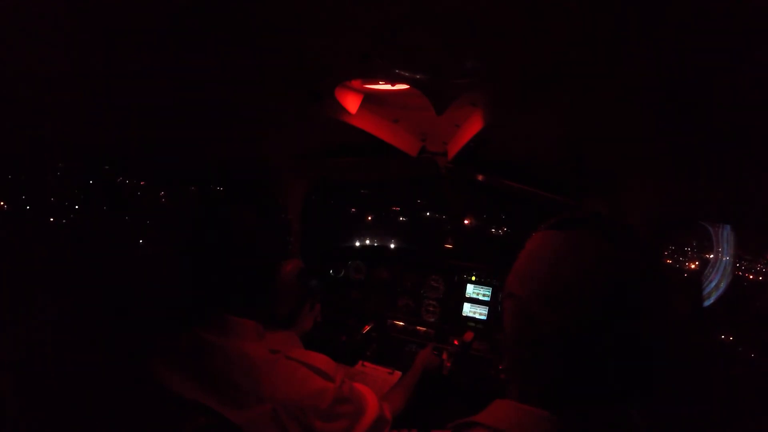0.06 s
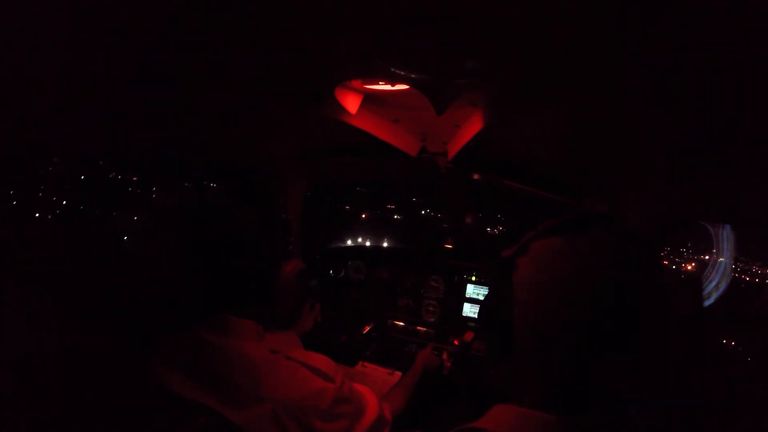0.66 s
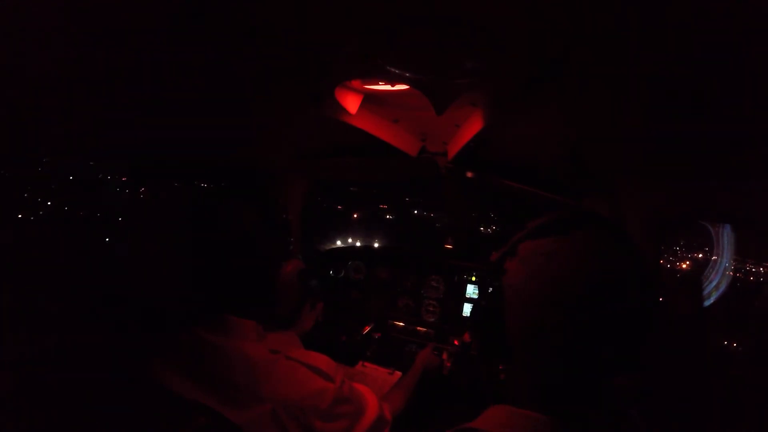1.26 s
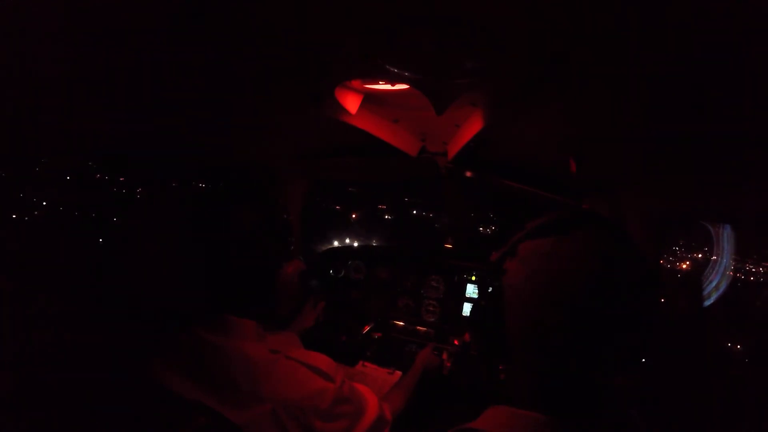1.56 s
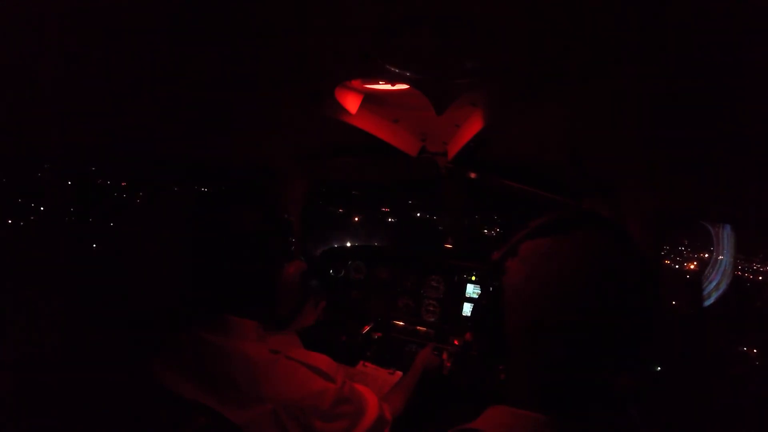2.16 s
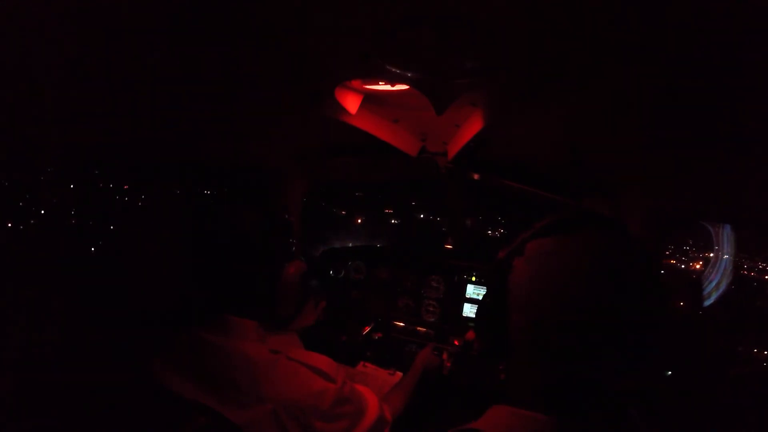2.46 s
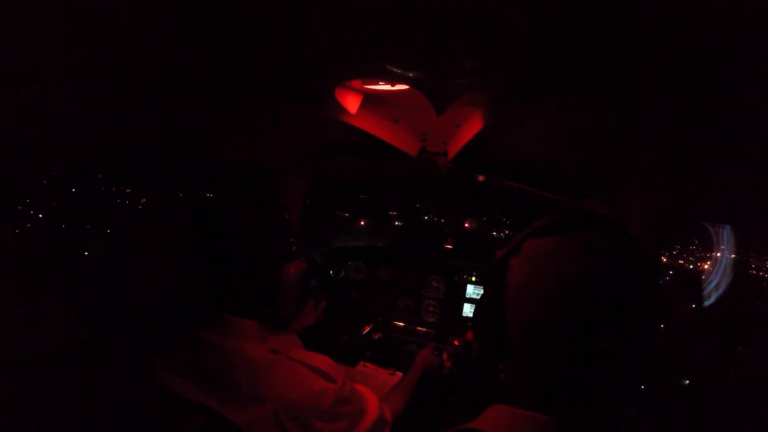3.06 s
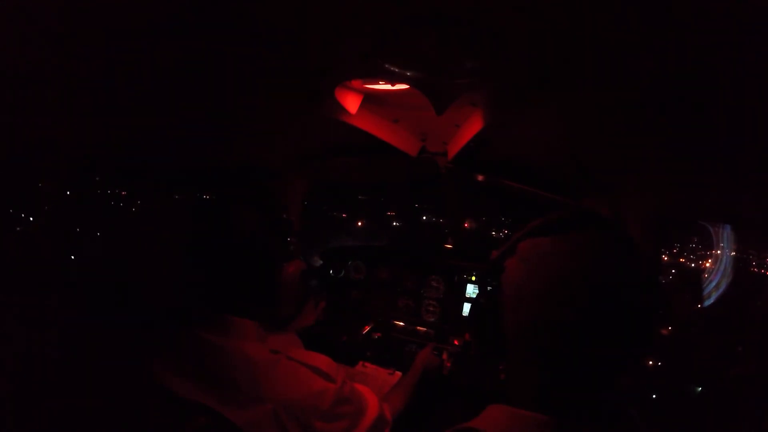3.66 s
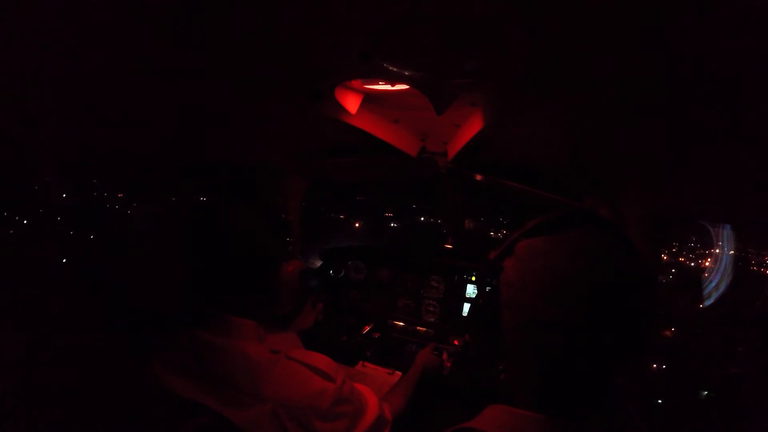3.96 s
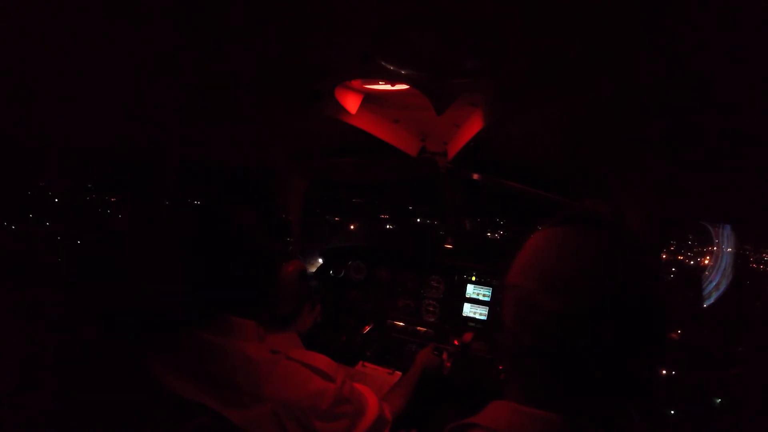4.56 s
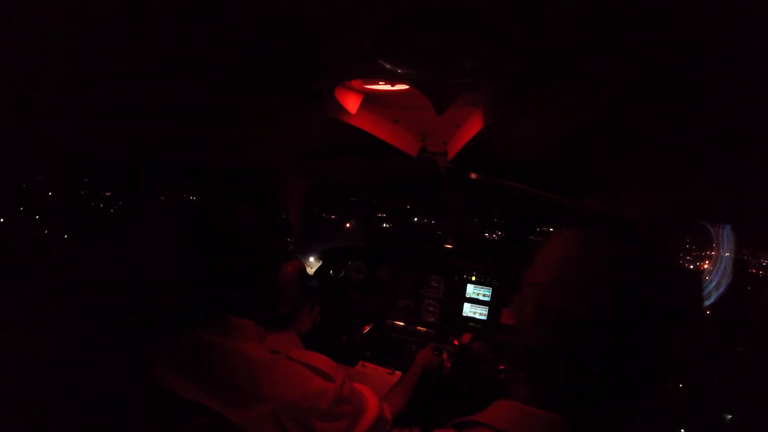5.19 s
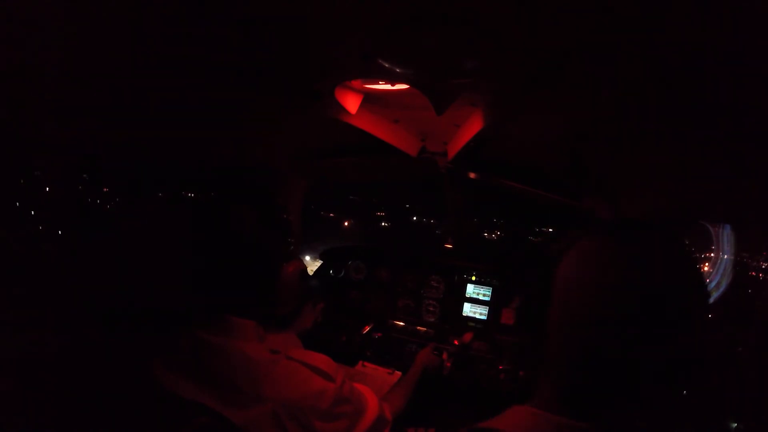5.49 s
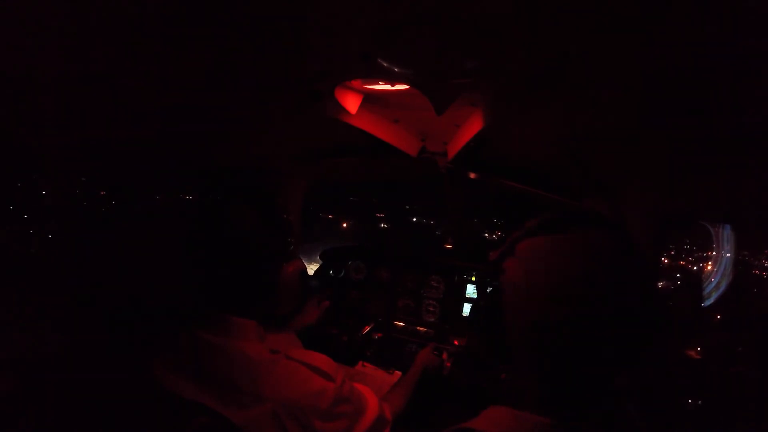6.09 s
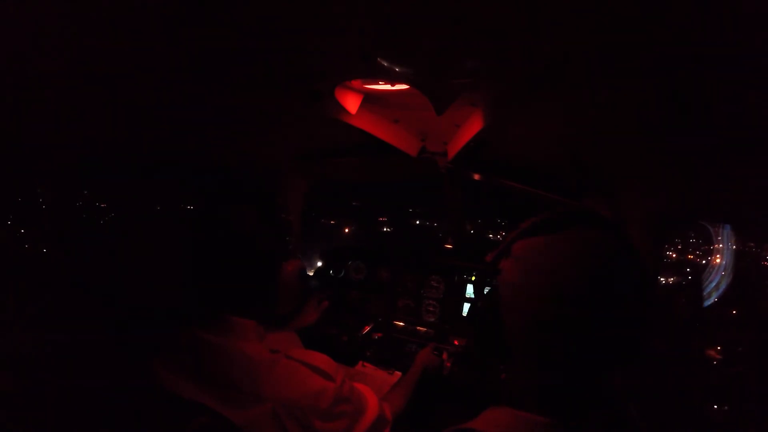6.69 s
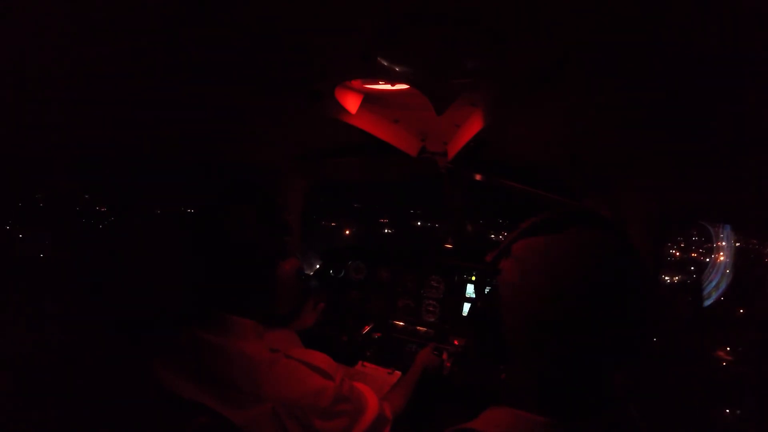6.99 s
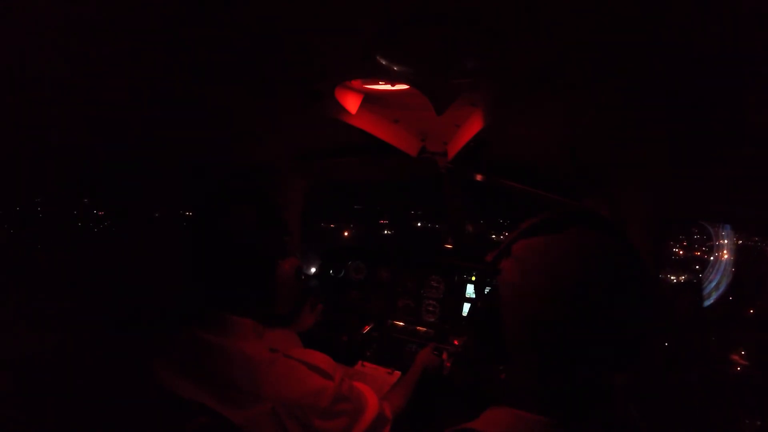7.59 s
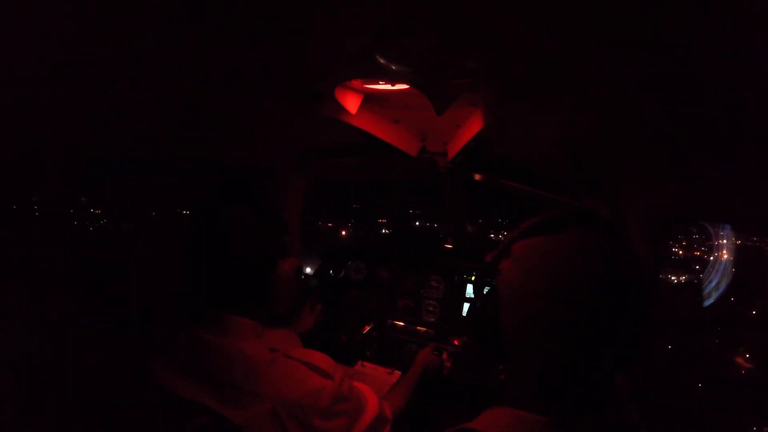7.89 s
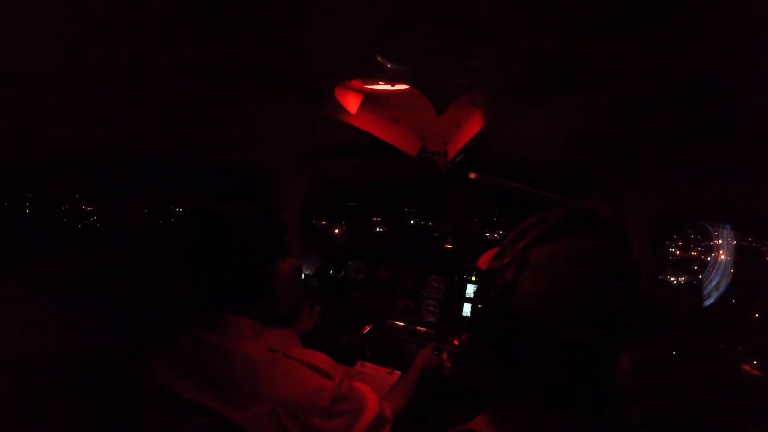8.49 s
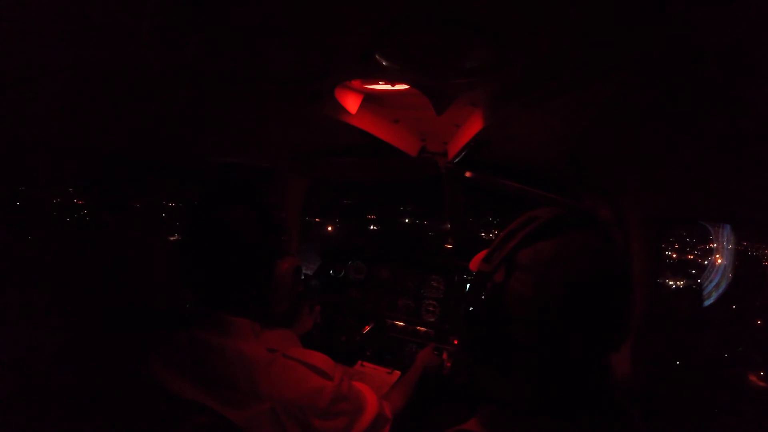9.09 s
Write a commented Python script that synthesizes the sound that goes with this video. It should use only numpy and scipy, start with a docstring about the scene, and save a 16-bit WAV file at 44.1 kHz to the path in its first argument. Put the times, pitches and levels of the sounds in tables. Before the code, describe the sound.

Steady piston engine and propeller drone inside a light aircraft, over rushing wind, a faint whine and an unevenly swelling cabin hum.

```python
"""Inside the cockpit of a light aircraft cruising level at night. From the start, a four-cylinder engine
and its propeller drone at about 1820 turns a minute, rough air shakes the body, and wind rushes over the
skin and hisses through vents and seals under a thin whine. Within half a second the shaken cabin air
booms near 164 Hz, then keeps surging, hardest at about 1.4 s and 7.8 s. The drone holds to the end."""
import sys
import numpy as np
from scipy import signal
from scipy.fft import rfft, irfft
from scipy.io import wavfile

SR = 44100
rng = np.random.default_rng(int(sys.argv[2]) if len(sys.argv) > 2 else 0)


def master_out(mix):
    """Clip the mix to full scale and print it as 16-bit PCM to the path in sys.argv[1]."""
    frames = np.transpose(np.atleast_2d(mix))
    ceiling = np.clip(frames, -1, 1)
    pcm = np.round(ceiling * 32767).astype(np.int16)
    wavfile.write(sys.argv[1], SR, pcm)


N = 411876
TIME = np.arange(N) / SR
FREQS = np.maximum(np.fft.rfftfreq(N, 1 / SR), 1)

# air rushing over the skin: f/Hz, level/dB per Hz
RUSH_SPECTRUM = [(150, -71), (320, -65.5), (500, -68), (720, -77), (890, -75), (965, -82), (1250, -74.5),
                 (1580, -82), (2100, -77.5), (3250, -78), (4150, -91.5), (7200, -103.5), (10000, -112),
                 (12000, -117), (13400, -128)]
# pitches at which panels, vents and door seals ring: f/Hz, width/Hz, level/dB per Hz
GAP_RESONANCES = [(451, 50, -70), (644, 32, -76), (1057, 56, -73), (1146, 66, -72.5), (1425, 130, -82),
                  (1717, 92, -79.5), (2326, 186, -68), (2469, 74, -70), (2930, 100, -82), (3290, 63, -77.5),
                  (3418, 110, -69.5), (3570, 136, -73), (3834, 180, -78.5), (4820, 920, -88),
                  (5860, 400, -90.5), (6300, 340, -90), (7000, 290, -102), (7870, 480, -102.5),
                  (9250, 610, -110)]
# rumble of the shaken body: f/Hz, level/dB per Hz
SHAKE_SPECTRUM = [(7, -73.5), (12, -33.5), (21, -55.5), (32, -56.5), (41, -43.5), (55, -44), (68, -54),
                  (84, -49), (110, -55), (135, -52.5), (180, -51.5), (205, -58), (250, -65.5), (450, -92.5)]
# how the shaking rises and falls (only the distance from the average counts): t/s, level/dB
SHAKE_LEVELS = [(0.0, -25.5), (0.12, -28), (0.44, -28), (2.12, -29.5), (2.28, -31.5), (2.48, -27.0),
                (2.76, -28), (3.12, -28), (3.32, -27), (3.8, -31.5), (3.96, -30), (4.52, -28.0), (5.2, -28),
                (5.52, -27.0), (5.96, -31.5), (6.08, -29.5), (6.64, -29.5), (6.88, -27.5), (7.08, -30),
                (7.76, -27.5), (7.92, -28), (8.16, -31.0), (8.52, -26.5), (9.33, -31.5)]
# surges of the cabin boom: peak t/s, length/s, level/dB before the boost, f/Hz
BOOM_SURGES = [(0.15, 0.16, -27.5, 165), (0.409, 0.148, -22.5, 167), (0.626, 0.052, -23.5, 167),
               (0.863, 0.21, -24, 163), (1.16, 0.1, -22.5, 163), (1.348, 0.043, -21, 166),
               (1.436, 0.046, -19, 165), (1.7, 0.22, -22.5, 163), (1.836, 0.076, -22, 164),
               (2.026, 0.12, -23.5, 165), (2.272, 0.078, -21.5, 162), (2.686, 0.092, -24, 163),
               (2.821, 0.187, -30, 164), (3.018, 0.054, -26.5, 168), (3.161, 0.093, -21.5, 165),
               (3.346, 0.059, -25, 164), (3.76, 0.168, -26, 163), (4.043, 0.081, -21, 165),
               (4.25, 0.24, -26, 161), (4.53, 0.056, -32, 160), (4.891, 0.033, -20, 164),
               (5.028, 0.16, -22, 165), (5.414, 0.11, -29, 163), (5.507, 0.04, -24, 159),
               (5.608, 0.083, -21.5, 164), (6.113, 0.16, -22.0, 163), (6.538, 0.048, -24, 160),
               (6.841, 0.23, -25.5, 162), (7.09, 0.13, -20.5, 163), (7.373, 0.17, -25, 165),
               (7.477, 0.06, -25, 164), (7.76, 0.16, -19.5, 163), (7.977, 0.13, -20, 163),
               (8.26, 0.11, -22, 163), (8.472, 0.091, -22.5, 164), (8.693, 0.1, -22, 161),
               (8.873, 0.14, -25.5, 161), (9.012, 0.11, -23.0, 164), (9.257, 0.13, -27.5, 163)]
# engine cycles per second, one cycle being two turns of the shaft: t/s, f/Hz
CYCLE_RATE = [(0, 15.195), (.8, 15.195), (1.5, 15.21), (3, 15.22), (3.8, 15.2), (5.2, 15.2), (6.2, 15.185),
              (9.34, 15.178)]
# engine tones that keep their average strength: multiple of the cycle rate, level/dB
STEADY_TONES = [(1, -36.4), (2, -37.8), (5, -40), (6, -40.6), (7, -49.4), (8, -42.3), (9, -40.2), (10, -42),
                (12, -30.8), (17, -54), (19, -54), (22, -60), (23, -61), (25, -63), (28, -55.3), (29, -56),
                (30, -54.8), (33, -57.3), (37, -67), (49, -69), (53, -62.5), (55, -69), (57, -64.5)]
# engine tones that slowly swell and fade: multiple of the cycle rate, list of (t/s, level/dB)
SWELLING_TONES = [(3, [(0, -35), (1.5, -34), (2.5, -28.5), (3, -33), (4.5, -35.5), (5.5, -30), (6.8, -35.5),
                  (8.5, -31.5), (9.34, -32)]), (4, [(0, -28), (.9, -31.5), (1.5, -27.5), (2, -26.5),
                  (2.6, -30), (5.8, -28.8), (6.7, -31.5), (7.6, -29), (9.34, -30)]), (16, [(0, -45),
                  (.5, -44.5), (1.1, -56), (2, -58), (2.6, -48.5), (5.5, -51), (6, -53), (6.5, -45),
                  (7.5, -43), (9.34, -44.5)]), (20, [(0, -49), (2, -48), (3.4, -49.5), (4, -42), (5, -49.5),
                  (6, -44.5), (7, -46), (7.5, -54), (8, -44.5), (9.34, -48)])]


def from_db(db):
    """Turns decibels into a factor to multiply by."""
    return 10 ** (np.asarray(db) / 20)


def curve(rows):
    """Joins (t/s, value) points with straight lines."""
    return np.interp(TIME, *np.transpose(rows))


def spectrum(rows):
    """Gain at each frequency from (f/Hz, level/dB) points, falling away above the last."""
    hz, db = np.transpose(rows)
    roll_off = np.minimum(hz[-1] / FREQS, 1) ** 2
    return from_db(np.interp(np.log(FREQS), np.log(hz), db)) * roll_off


def resonance(hz, width_hz):
    """Gain of something that rings at one pitch: 1 there, dropping steeply on both sides."""
    detune = (FREQS / hz - hz / FREQS) * hz / width_hz
    return 1 / np.hypot(1, detune ** 2)


def noise(gain):
    """Noise whose strength at each frequency follows the gain."""
    return irfft(rfft(rng.standard_normal(N)) * gain, N) * np.sqrt(SR / 2)


def wander(rate_hz):
    """A smooth random wobble around 0, of typical size 1; a higher rate makes it quicker."""
    drift = noise(1 / (1 + (FREQS / rate_hz) ** 2) ** 2)
    return (drift - drift.mean()) / drift.std()


def whine(level_db=-54):
    """A thin, unsteady tone, as from a small spinning part behind the panel."""
    tone = noise(resonance(hz=798.4, width_hz=19))
    return from_db(level_db) * tone / tone.std()


def airflow(cycles, pulse_depth=0.041, gust_db=-0.19, flutter_db=0.39):
    """Air rushes over the skin, pushed lightly by each propeller blade, and hisses in the gaps."""
    blade_pulse = np.cos(2 * np.pi * 4 * cycles)  # four blades pass in each engine cycle
    rush = noise(spectrum(RUSH_SPECTRUM)) * (1 + pulse_depth * blade_pulse)
    gap_power = sum((from_db(db) * resonance(hz, width)) ** 2 for hz, width, db in GAP_RESONANCES)
    hiss = noise(np.sqrt(gap_power)) * from_db(flutter_db * wander(rate_hz=26))
    return (rush + hiss) * from_db(gust_db * wander(rate_hz=1.5))


def body_shake(swing=0.98):
    """Rough air shakes the aircraft's body into a deep rumble, now harder, now softer."""
    db = curve(SHAKE_LEVELS)
    return noise(spectrum(SHAKE_SPECTRUM)) * from_db(swing * (db - db.mean()))


def cabin_boom(hum_db=-31, boost_db=1, drift_hz=2.497, flutter_depth=0.1):
    """Uneven shaking makes the cabin air ring: a ragged hum that firms up into one tone in each surge."""
    pitch = curve([(peak, hz) for peak, _, _, hz in BOOM_SURGES]) + drift_hz * wander(rate_hz=9)
    tone = np.sqrt(2) * np.sin(2 * np.pi * np.cumsum(pitch) / SR)
    surge_power = np.zeros(N)
    for peak, length, db, _ in BOOM_SURGES:
        bell_curve = .5 ** ((2 * (TIME - peak) / length) ** 2)
        surge_power += (from_db(db) * bell_curve) ** 2
    swell = np.sqrt(surge_power)
    surges = swell * (1 + flutter_depth * wander(rate_hz=16)) * tone
    hum = noise(resonance(hz=163.1, width_hz=18.7))
    hum_share = 1 / np.hypot(1, swell / from_db(hum_db))  # the hum gives way as a surge grows
    return from_db(boost_db) * surges + from_db(hum_db) * hum_share * hum / hum.std()


def engine(cycles, waver=0.061, waver_growth=0.006, knock_above=14, knock_spread=.19):
    """Four firings and four blade passes repeat each cycle, making a stack of tones: the drone."""
    swelling = [(multiple, curve(levels)) for multiple, levels in SWELLING_TONES]
    drone = np.zeros(N)
    for multiple, db in STEADY_TONES + swelling:
        # the cabin smears low tones into a rumble; high ones arrive nearly together, one knock a cycle
        spread_turns = knock_spread if multiple > knock_above else 1
        phase = 2 * np.pi * (multiple * cycles + spread_turns * rng.standard_normal())
        depth = waver + waver_growth * multiple  # higher tones waver more in the unsteady air
        drone += from_db(db) * np.sqrt(2) * (1 + depth * wander(rate_hz=2.5)) * np.cos(phase)
    return drone


def scene():
    """Everything as heard from a seat in the cabin, in one channel."""
    cycles = np.cumsum(curve(CYCLE_RATE)) / SR  # engine cycles completed so far
    return (engine(cycles) + cabin_boom() + body_shake() + airflow(cycles) + whine())[None]


def record(dry):
    """Cuts away the highest treble, above 13500 Hz."""
    low_pass = signal.ellip(8, .2, 70, 13500, fs=SR, output="sos")
    return signal.sosfilt(low_pass, dry)


dry = scene()
out = record(dry)
master_out(out)
```